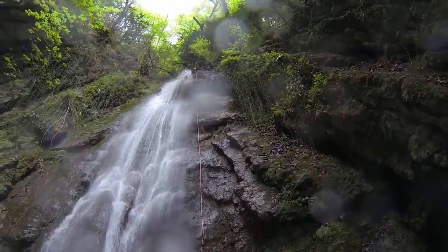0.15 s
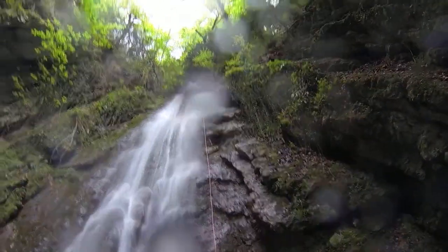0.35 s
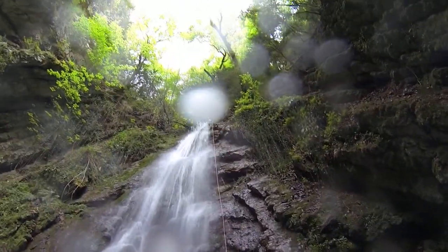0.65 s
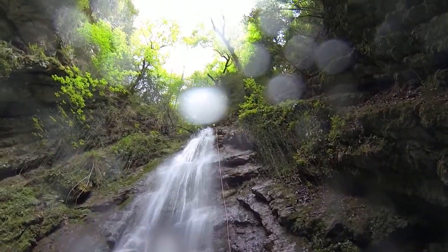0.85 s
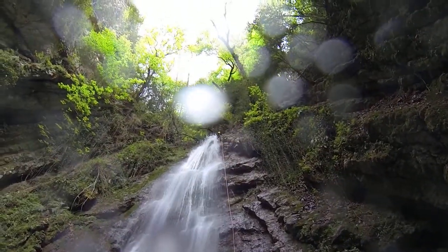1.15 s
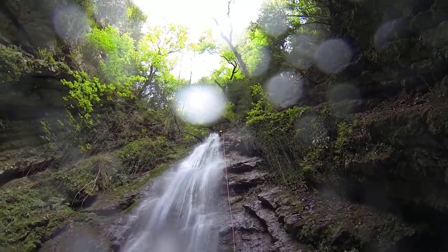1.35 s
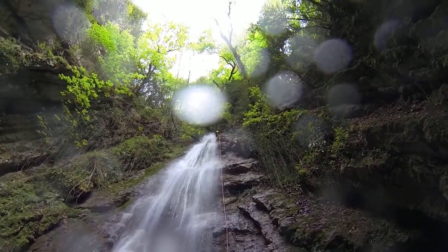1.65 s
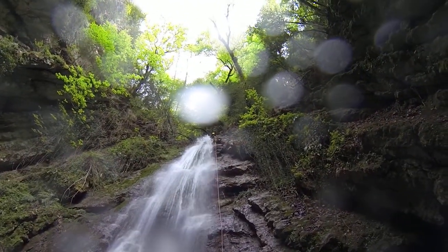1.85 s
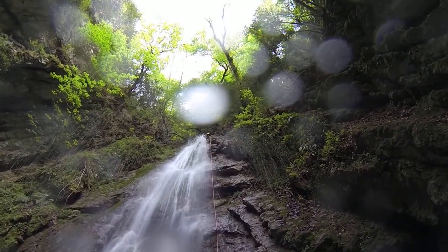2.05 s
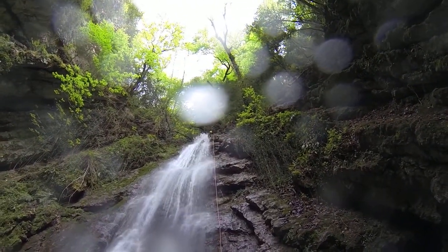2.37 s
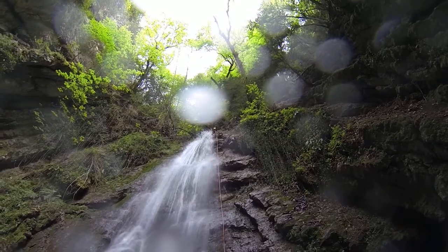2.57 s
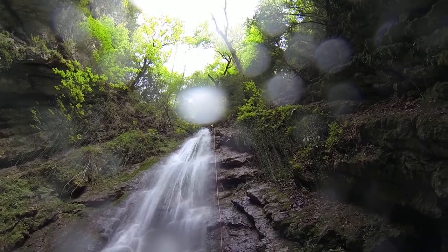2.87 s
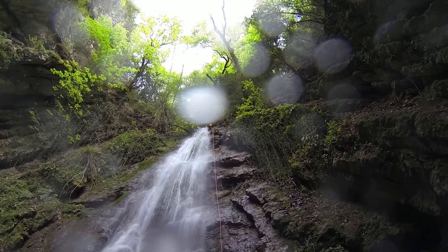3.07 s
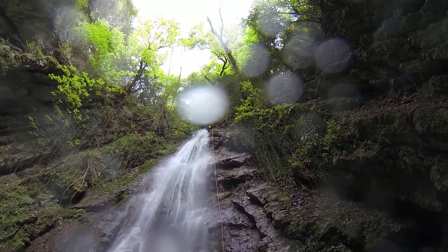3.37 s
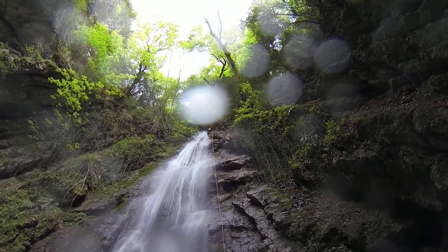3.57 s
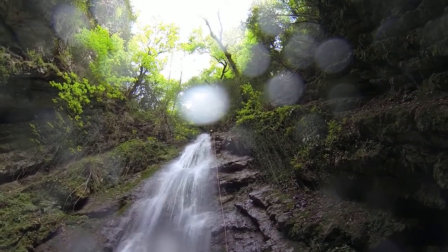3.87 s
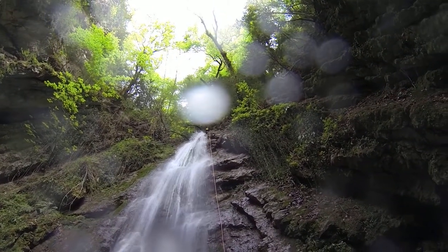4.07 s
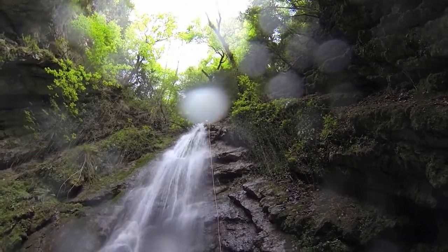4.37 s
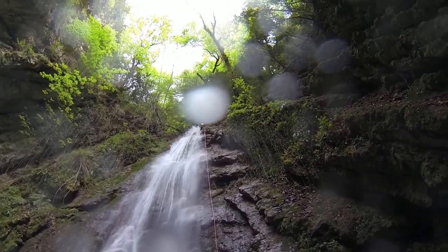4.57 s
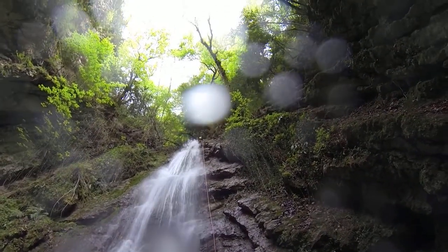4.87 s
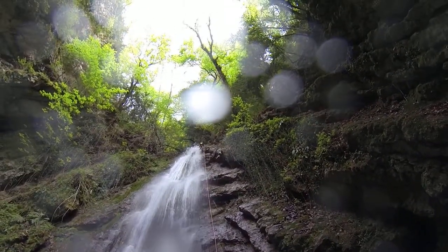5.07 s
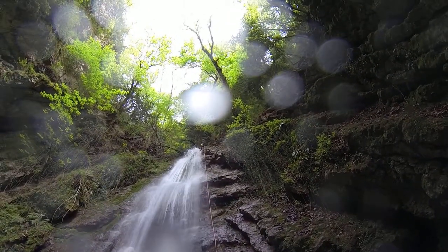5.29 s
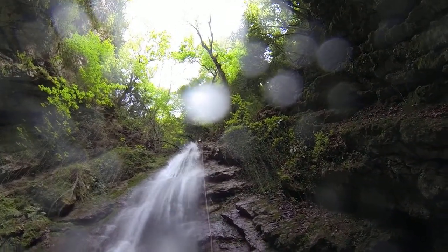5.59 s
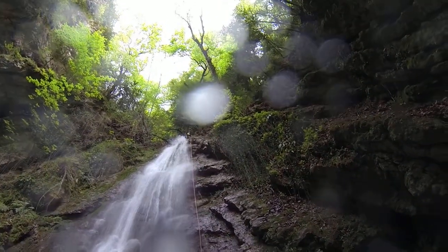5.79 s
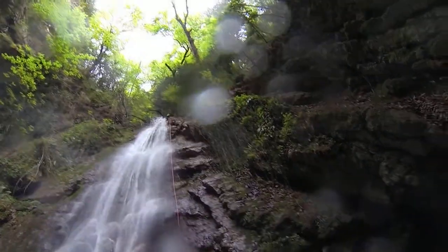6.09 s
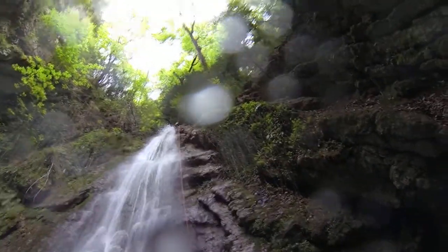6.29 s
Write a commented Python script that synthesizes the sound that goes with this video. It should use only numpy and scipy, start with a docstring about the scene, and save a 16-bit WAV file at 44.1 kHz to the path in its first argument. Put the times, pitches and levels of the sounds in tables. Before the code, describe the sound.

A waterfall pours down a rock face in a steady, dense rush, with a boxy, plasticky colour from the wet sealed case around the microphone. Underneath, the carried mount throbs faintly about three times a second, with occasional soft bumps and rubs. Halfway through, a narrow hissy ring jumps higher. At the very end, handling grows and several hard knocks hit the case, overloading it, and the water suddenly drops in level.

```python
"""A waterfall rushes down rock: patchy noise and drop impacts, coloured by the resonances of a wet plastic case.
The case seals a small camera on a carried mount; the ring of its microphone port jumps up in pitch midway.
The mount throbs and rubs in the bass: bands of noise that follow listed swells and movements.
At the end something knocks the case several times (damped sines), and the gain control ducks."""
import sys
import numpy as np
from scipy import signal
from scipy.fft import rfft, irfft, next_fast_len
from scipy.io import wavfile
from scipy.ndimage import uniform_filter1d, map_coordinates

SR = 44100
rng = np.random.default_rng(int(sys.argv[2]) if len(sys.argv) > 2 else 0)


def wav_record(signal):
    """Record a signal, one row per channel, as 16-bit PCM in the file named by sys.argv[1]."""
    frames = np.transpose(np.atleast_2d(signal))
    bounded = np.clip(frames, -1, 1)
    # unit amplitude maps onto the largest positive 16-bit level
    quanta = np.round(bounded * 32767).astype(np.int16)
    wavfile.write(sys.argv[1], SR, quanta)


N = 284035  # samples


def amp(db):
    """Level to amplitude: 20 dB is a factor of ten."""
    return 10 ** (np.asarray(db) / 20)


def unit(x):
    """Normalisation: scales a signal to rms 1."""
    return x / np.sqrt(np.mean(x ** 2) + 1e-20)


def along(points, hz):
    """Spectral envelope: dB interpolated over log frequency, -120 dB outside the points."""
    point_hz, point_db = np.transpose(points)
    return np.interp(np.log(hz + 1), np.log(point_hz + 1), point_db, left=-120, right=-120)


def curves(rows):
    """Linear interpolation in time: one curve for each column after the time."""
    time_s, *columns = np.transpose(rows)
    return [np.interp(np.arange(N) / SR, time_s, column) for column in columns]


def wobble(rate):
    """Slow random modulation: a smooth curve through Gaussian knots, rate of them a second."""
    knots = rng.standard_normal(int(N * rate / SR) + 4)
    return map_coordinates(knots, [np.arange(N) * rate / SR])


def filtered(x, response):
    """Linear filtering: the spectrum is multiplied by a response of frequency."""
    size = next_fast_len(N + SR // 2)  # padded against wrap-around
    return irfft(rfft(x, size) * response(np.fft.rfftfreq(size, 1 / SR)), size)[..., :N]


def hiss(spectrum):
    """Coloured noise: white noise shaped by a spectral envelope, at rms 1."""
    return unit(filtered(rng.standard_normal(N), lambda hz: amp(along(spectrum, hz))))


def steady(x, span_s, slack):
    """Envelope flattening: division by the running rms evens out swells longer than span_s."""
    power = np.abs(uniform_filter1d(x ** 2, size=int(span_s * SR)))
    return x / np.sqrt(power + abs(slack))  # slack limits the correction


def bumps(times, peak_db, rise, fall):
    """Addition of powers: swells peak at the given times, 10 dB down at rise s before and fall s after."""
    grid = np.arange(0, N, 32)
    t = grid / SR - np.asarray(times)[:, None]
    shape_db = -10 * (np.where(t < 0, t / rise, t / fall)) ** 2
    power = (amp(np.asarray(peak_db)[:, None] + shape_db) ** 2).sum(axis=0)
    return np.interp(np.arange(N), grid, power)


# Spectral densities of the mount's swing, shake and rub: (frequency_hz, relative_density_db)
SWING_SPECTRUM = [(10, -22), (19, -7), (26, 0.5), (33, -7.5), (45, -30.5), (65, -33.5), (90, -36.5)]
SHAKE_SPECTRUM = [(35, -2), (60, -3), (85, -3), (104, 2), (125, -10.5), (180, -24), (260, -40)]
RUB_SPECTRUM = [(150, -8), (260, 3.5), (370, 4.5), (520, 0.5), (620, -12), (900, 3.5)]
# A throb passes through the mount about every 0.36 s: (peak_s, swing_db)
THROBS = [(.07, -33), (.47, -35), (.83, -30.5), (1.2, -31), (1.58, -34), (1.9, -32), (2.26, -31.5),
          (2.62, -39), (2.98, -32.5), (3.36, -34), (3.71, -33), (4.06, -34), (4.43, -33), (4.84, -32),
          (5.16, -33), (5.48, -34.5), (5.88, -32.5), (6.26, -29)]
THROB_RISE_S, THROB_FALL_S = 0.081, 0.071  # to and from 10 dB below the peak
# Single jolts of the mount: (peak_s, swing_db, shake_db, rub_db)
JOLTS = [(.26, -35, -53, -57), (.35, -36, -33.5, -62), (.57, -25.5, -50, -61), (.71, -29.5, -54, -62),
         (.99, -38, -49, -68), (1.31, -37.5, -39, -60), (1.41, -47, -39, -67), (1.5, -45, -54, -65),
         (1.73, -43, -51, -50), (2.02, -46, -41, -65), (2.65, -53, -48, -68), (2.8, -43, -63, -70),
         (3.15, -59, -42.5, -59), (4.16, -48, -56, -58), (4.25, -60, -47, -63), (4.31, -30.5, -52, -47),
         (4.36, -45, -44, -59), (5.01, -37.5, -55, -67), (5.6, -41, -49, -59), (5.71, -31, -45.5, -46),
         (5.97, -36, -42, -53), (6.07, -30, -33.5, -48), (6.11, -23.5, -42, -53), (6.15, -25, -29.5, -42.5),
         (6.19, -29.5, -42, -49)]
JOLT_RISE_S, JOLT_FALL_S = 0.039, 0.051  # to and from 10 dB below the peak
# How much the mount is moved about: (time_s, shake_db, rub_db)
MOVING = [(0, -36.5, -49.5), (.1, -48, -54), (.19, -52, -54), (.3, -37.5, -49), (.72, -43.5, -51.5),
          (.82, -52, -63), (1.15, -49.5, -60), (1.45, -45.5, -57.5), (1.85, -47.5, -57.5),
          (2.15, -44.5, -58), (2.4, -55.5, -57.5), (3.45, -56.5, -59.5), (4.4, -52.5, -56.5),
          (5.52, -53, -60), (5.62, -42.5, -49.5), (6.0, -45, -50), (6.26, -43, -45), (6.375, -34, -37),
          (6.415, -29, -59), (6.44, -19, -45)]
SWING_AT_REST_DB, SWING_FOLLOWS = -44.5, 0.35  # at a shake of -50 dB; dB of swing per dB of shake


def mount():
    """Forced vibration: the mount swings at its low resonance, shakes near 100 Hz and rubs against cloth."""
    shake_db, rub_db = curves(MOVING)
    jolt_s, *jolt_db = np.transpose(JOLTS)
    jolt_swing, jolt_shake, jolt_rub = [bumps(jolt_s, db, JOLT_RISE_S, JOLT_FALL_S) for db in jolt_db]
    throbs = bumps(*np.transpose(THROBS), THROB_RISE_S, THROB_FALL_S)

    rest_db = SWING_AT_REST_DB + SWING_FOLLOWS * (shake_db + 50)
    swing_power = amp(rest_db) ** 2 + jolt_swing + throbs
    shake_power = amp(shake_db) ** 2 + jolt_shake
    rub_power = amp(rub_db) ** 2 + jolt_rub

    swing = steady(hiss(SWING_SPECTRUM), span_s=.07, slack=0.04)
    tremor = wobble(30)  # shared by shake and rub
    flutter = amp(0.38 * tremor + 1.9 * wobble(12))
    shake = unit(flutter * steady(hiss(SHAKE_SPECTRUM), span_s=0.065, slack=0.5))
    rub = unit(amp(0.29 * tremor) * hiss(RUB_SPECTRUM))
    return np.sqrt(swing_power) * swing + np.sqrt(shake_power) * shake + np.sqrt(rub_power) * rub


def ringing(s, db, hz, t60, rise):
    """Damped oscillation: a sine starts at s, its envelope peaks at db and decays 60 dB in t60 s."""
    t = np.maximum(np.arange(N) / SR - s, 0)
    envelope = amp(-60 * t / t60) * (1 - np.exp(-t / rise)) ** 2
    return amp(db) * envelope / envelope.max() * np.sin(2 * np.pi * hz * t)


# Taps on the shell, references for its modes: (start_s, level_db, pitch_hz, t60_s)
TAPS = [(6.217, -29, 1500, .03), (6.226, -29, 1430, .02), (6.2824, -3.5, 1270, .021),
        (6.2868, -20, 1250, .02), (6.3022, -15, 1300, .018), (6.3298, -7, 1650, .018),
        (6.3350, -11, 1600, .012)]
# Modes of the shell relative to each tap: (pitch_ratio, relative_level_db, t60_ratio)
SHELL_MODES = [(1.004, -8, 0.51), (1.116, -24, 1), (0.63, -10, 0.57), (0.33, -11, 0.42), (0.18, -7.5, 0.96)]


def shell_taps():
    """Modal superposition: each tap excites damped shell modes that begin with an inward dent."""
    out = np.zeros(N)
    for start_s, level_db, pitch_hz, t60_s in TAPS:
        for ratio, mode_db, life in SHELL_MODES:
            out -= ringing(start_s, level_db + mode_db, ratio * pitch_hz, life * t60_s, rise=.0006)
    return out


# Pushes that swing the whole case:
# (start_s, peak_level_db, swing_hz, t60_s, rise_time_constant_s, direction as a sign)
PUSHES = [(6.282, -13, 88, .15, .001, -1), (6.302, -18, 110, .05, .001, -1), (6.310, -9, 62, .07, .003, -1),
          (6.3310, -2.5, 58, .06, .008, 1), (6.3383, 11.5, 92, .065, .002, -1),
          (6.342, -8, 14, 1.2, .003, 1), (6.4295, -9, 75, .1, .003, -1)]


def case_pushes():
    """Rigid-body oscillation: each push sets the whole case into a slow damped swing."""
    out = np.zeros(N)
    for start_s, level_db, swing_hz, t60_s, rise_s, direction in PUSHES:
        out += np.sign(direction) * ringing(start_s, level_db, swing_hz, t60_s, rise_s)
    return out


def knocks():
    """Superposition: short shell rings lie over slow swings of the case."""
    return shell_taps() + case_pushes()


# Spectral densities of the wet port's lower and upper ring: (frequency_hz, relative_density_db)
PORT_LOW_RING = [(3250, -8), (3520, -5.5), (3640, 0), (3760, -12.5), (3950, -15)]
PORT_HIGH_RING = [(3700, -33), (4050, 5.5), (4270, 4), (4550, -1), (5000, -7), (5400, -18)]
PORT_JUMP_S, PORT_JUMP_TAKES_S = 3.57, .02
PORT_LOW_DB, PORT_HIGH_DB = (-51.5, -62), (-53.5, -47.5)  # before and after the jump


def port_ring():
    """Resonance shift: the microphone port's lower ring weakens as its upper one grows."""
    t = np.arange(N) / SR
    jump = [PORT_JUMP_S, PORT_JUMP_S + PORT_JUMP_TAKES_S]
    low_db = np.interp(t, jump, PORT_LOW_DB) + 1.4 * wobble(8.07)
    low = amp(low_db) * hiss(PORT_LOW_RING)
    high_db = np.interp(t, jump, PORT_HIGH_DB) + 0.49 * wobble(14)
    high = amp(high_db) * hiss(PORT_HIGH_RING)
    return low + high


def splashes(count, patchy_db, spread_db, share):
    """Random superposition: a noise sheet of patchy gain carries single drop impacts of scattered size."""
    spectrum = signal.stft(rng.standard_normal(N + 512), nperseg=512)[2]
    field = uniform_filter1d(rng.standard_normal(spectrum.shape), 8, axis=0)  # smooth over frequency
    field = uniform_filter1d(field, 10, axis=1)  # smooth over time
    sheet = signal.istft(spectrum * amp(patchy_db * unit(field)), nperseg=512)[1][:N]

    places = rng.integers(0, N, count)
    sizes = rng.choice([-1, 1], count) * amp(spread_db * rng.standard_normal(count))
    drops = np.bincount(places, sizes, N)
    return unit(sheet) + share * unit(drops)


# Spectral density of the rush before the case resonances: (frequency_hz, relative_density_db)
RUSH_SPECTRUM = [(76, -44), (130, -13), (190, -16), (306, -19), (600, -16), (800, -9), (1010, -6),
                 (1440, -4), (3000, -10.5), (3700, -9), (4500, -17.5), (5450, -22), (9330, -26.5),
                 (12500, -29), (15400, -37.5)]
# Narrow resonances of the case: (centre_hz, width_hz at half the dB boost, boost_db)
CASE_RESONANCES = [(367, 50, 6), (1111, 87, 5.5), (1453, 110, 2.5), (2060, 400, 2.5), (2680, 280, 4),
                   (3215, 90, 2.5), (6240, 530, 7), (8520, 720, 4), (9540, 1120, 5), (11530, 540, 4.5)]
RUSH_DB = -39  # rms before the surge


def rush():
    """Source and filter: broadband spray is coloured by the resonances of the case."""
    def response(hz):
        case_db = sum(boost_db / (1 + (2 * (hz - centre_hz) / width_hz) ** 2)
                      for centre_hz, width_hz, boost_db in CASE_RESONANCES)
        return amp(along(RUSH_SPECTRUM, hz) + case_db)

    spray = splashes(count=30000, patchy_db=.8, spread_db=3, share=.3)
    return amp(RUSH_DB) * unit(filtered(spray, response))


def waterfall():
    """Amplitude modulation: one gentle random surge carries both the rush and the port ring."""
    surge = amp(.15 * wobble(5) + .3 * wobble(17))
    return surge * (rush() + port_ring())


def scene():
    """Linear superposition: mount, knocks and waterfall add."""
    return (mount() + knocks() + waterfall())[None]


def duck(x, top_db, depth_db, attack, quick, slow):
    """Dynamic compression: a lasting peak pulls the gain down fast; 30% releases quickly, 70% slowly."""
    level = signal.lfilter(np.ones(128) / 128, 1, np.abs(x))  # mean size over about 3 ms
    excess = (level / amp(top_db) - 1) * 4  # full pull at 1.25 times the threshold
    log_excess = np.log(np.clip(excess, 1e-9, 1))
    t = np.arange(N) / SR

    def held(release):
        """Peak holding: the largest excess so far decays exponentially."""
        return np.exp(np.maximum.accumulate(log_excess + t / release) - t / release)

    target = .3 * held(quick) + .7 * held(slow)
    step = 1 / (attack * SR)
    pull = signal.lfilter([step], [1, step - 1], target)  # the attack smooths the pull
    return x * amp(-depth_db * pull)


TOP_HZ = 15250  # upper band limit


def record(dry):
    """Nonlinear and band-limited transmission: gain control, clipping at full scale, then a low-pass."""
    # attack, quick and slow are time constants in s
    level = duck(dry[0], top_db=-8.5, depth_db=14.5, attack=.0035, quick=.004, slow=1.2)
    return filtered(np.clip(level, -1, 1), lambda hz: hz < TOP_HZ)[None]


dry = scene()
out = record(dry)
wav_record(out)
```